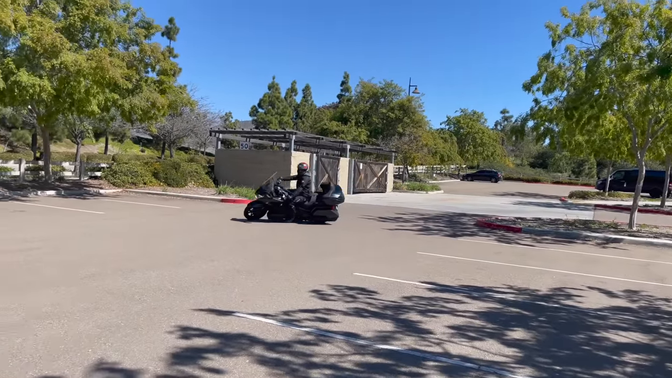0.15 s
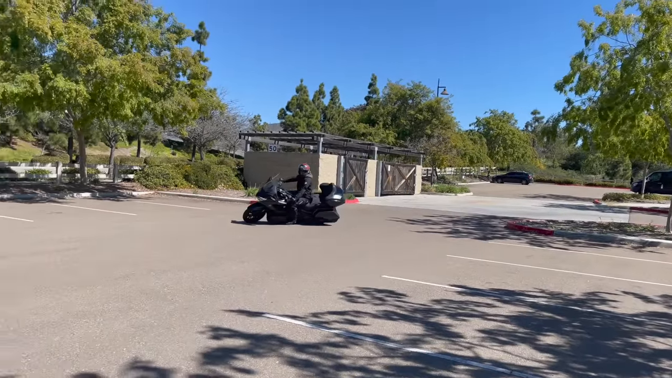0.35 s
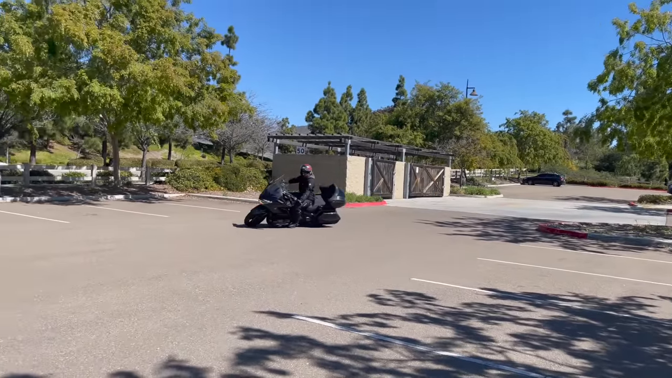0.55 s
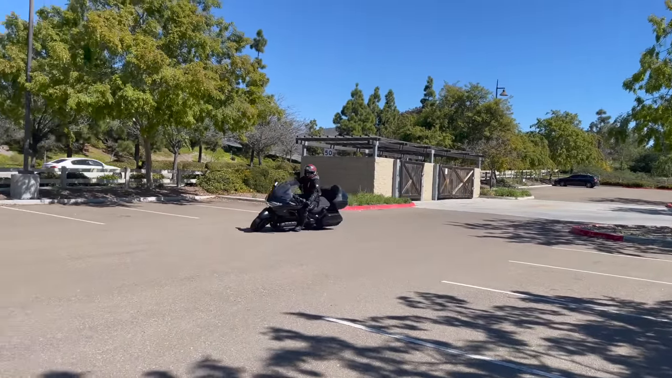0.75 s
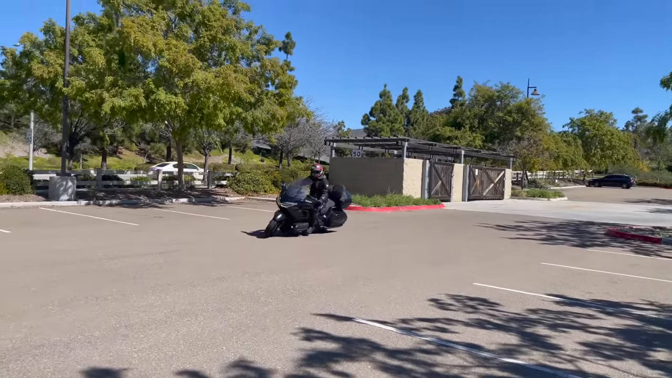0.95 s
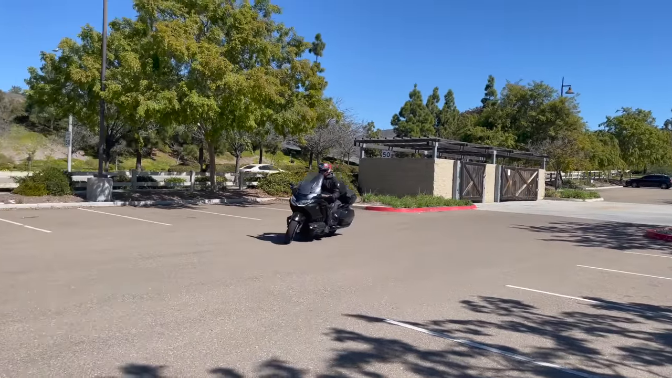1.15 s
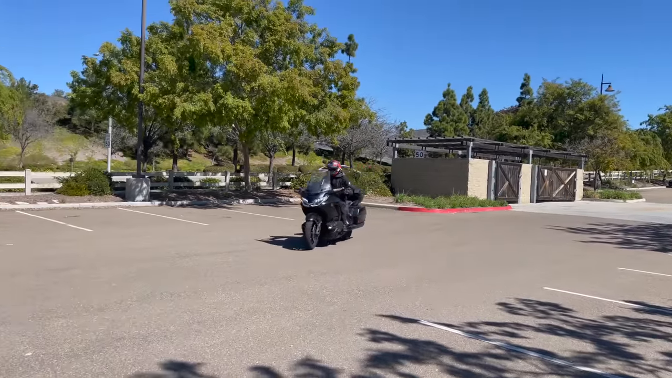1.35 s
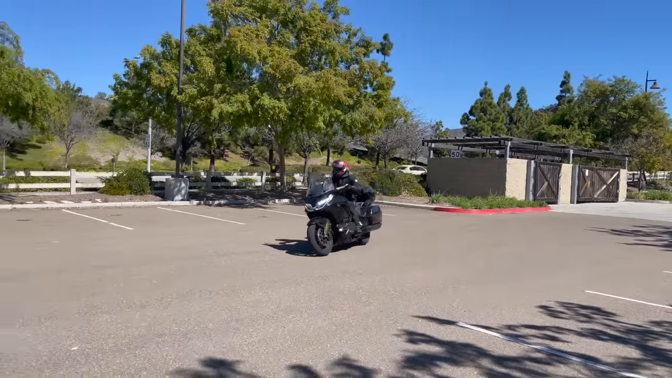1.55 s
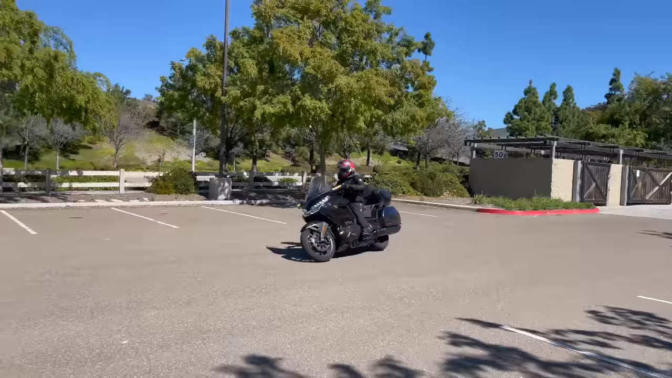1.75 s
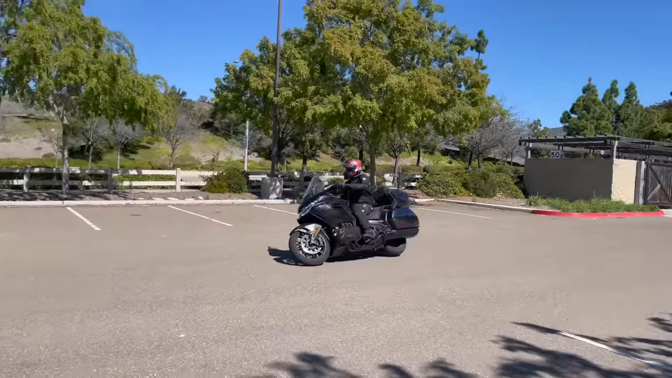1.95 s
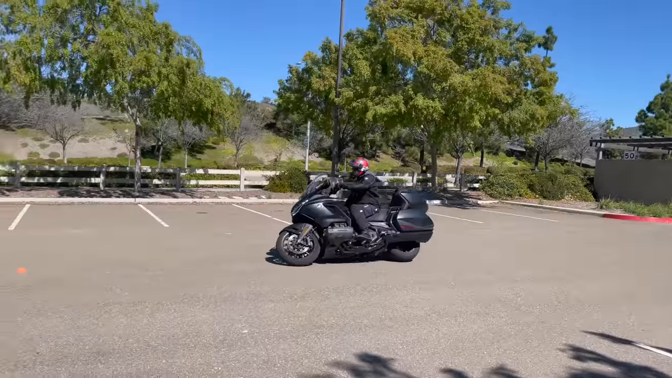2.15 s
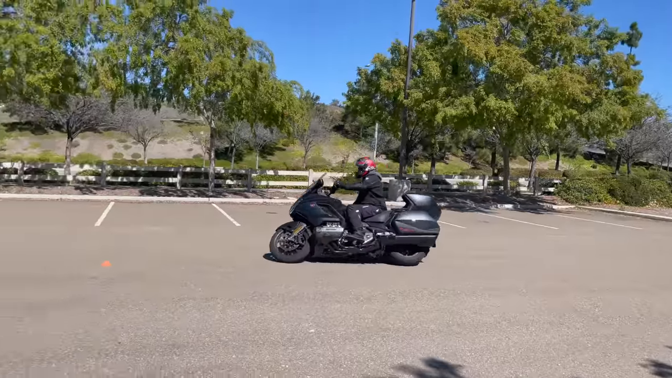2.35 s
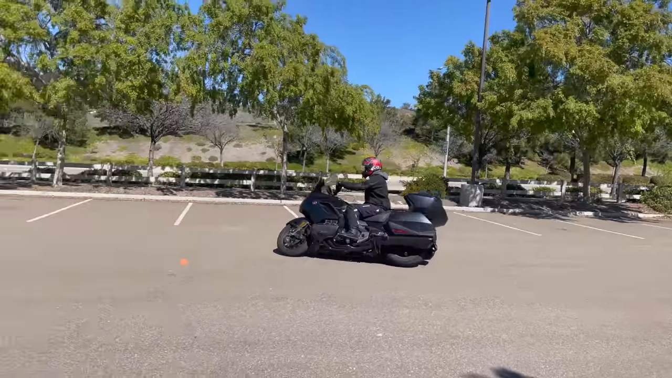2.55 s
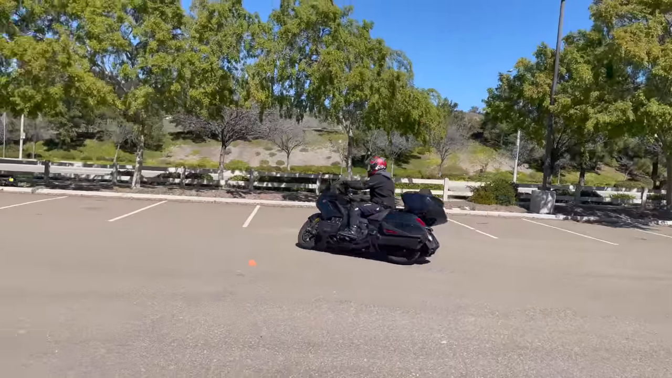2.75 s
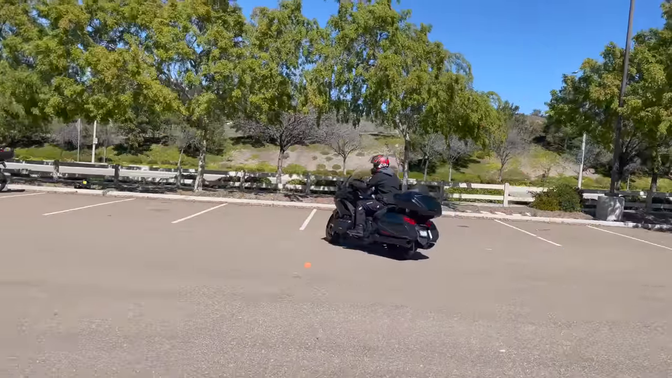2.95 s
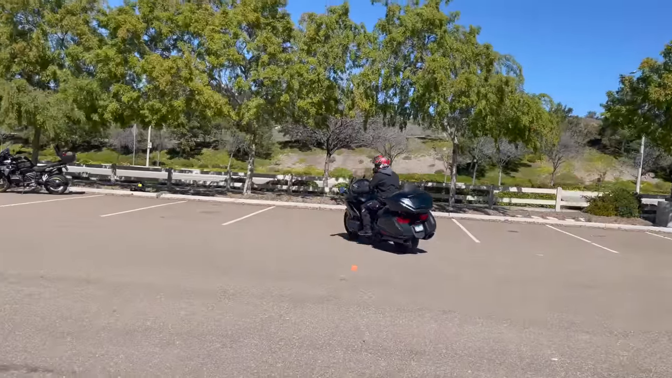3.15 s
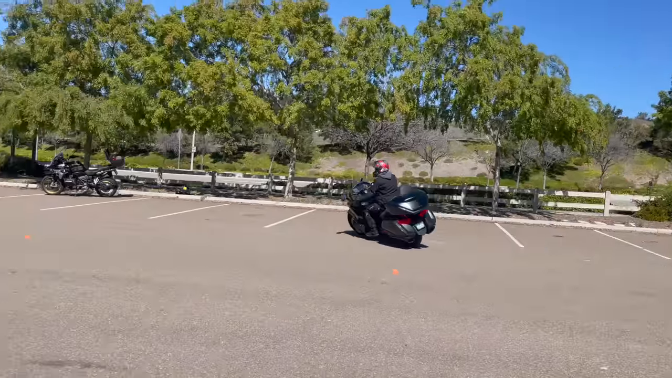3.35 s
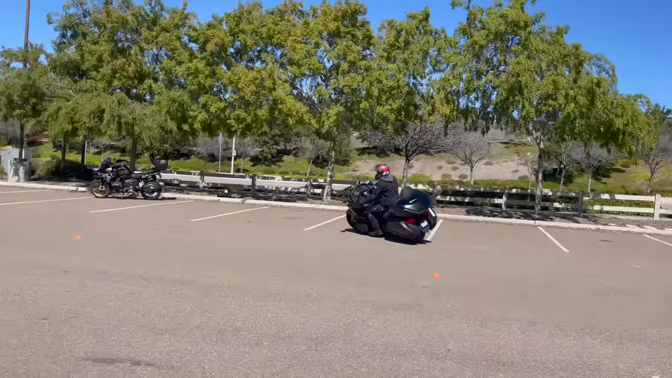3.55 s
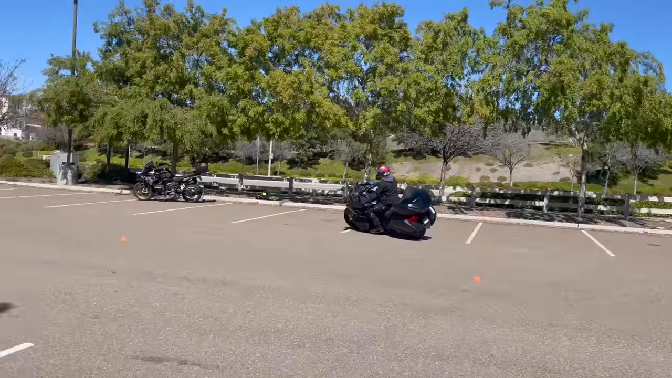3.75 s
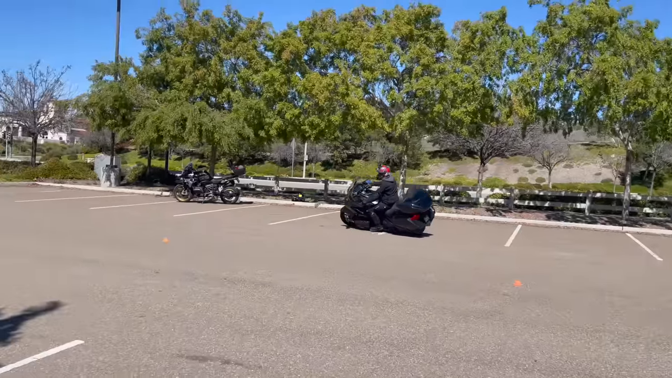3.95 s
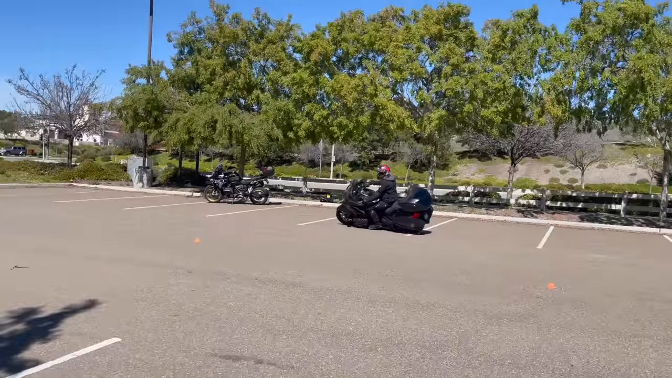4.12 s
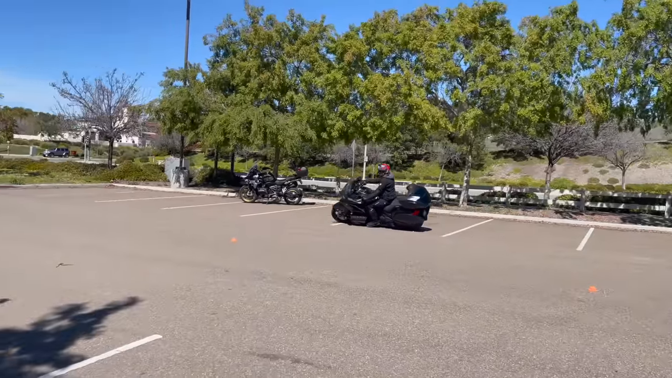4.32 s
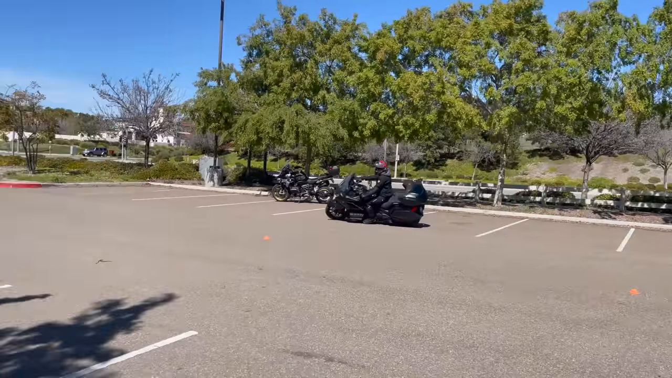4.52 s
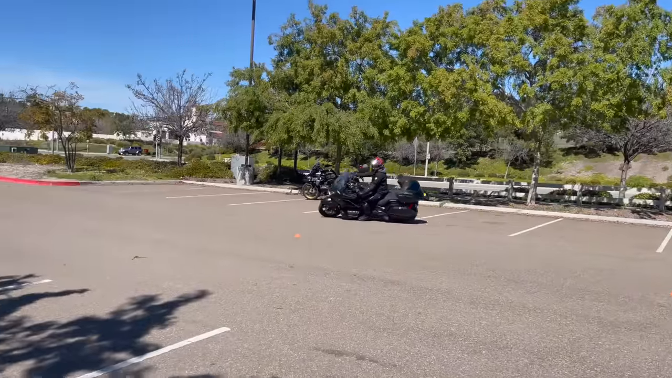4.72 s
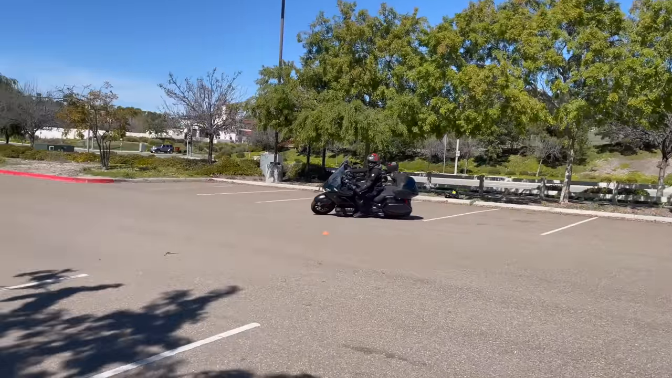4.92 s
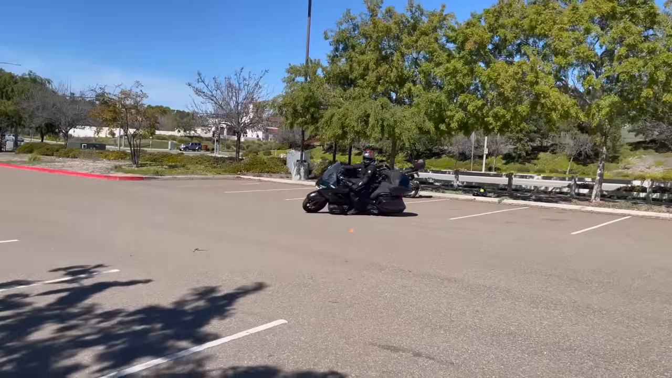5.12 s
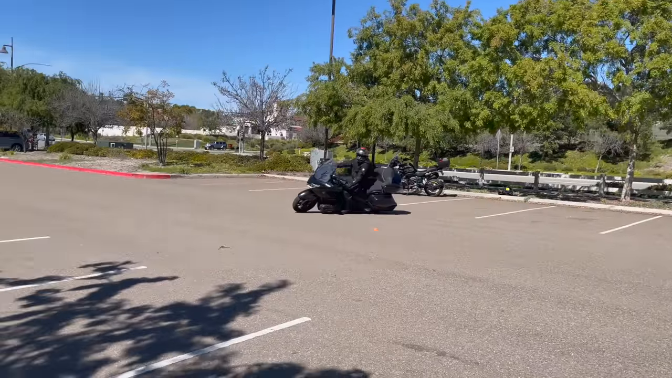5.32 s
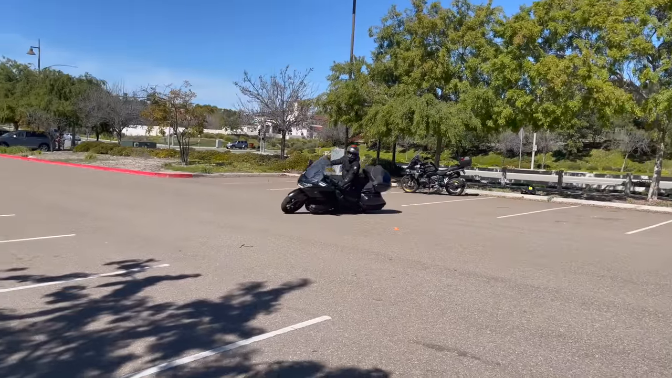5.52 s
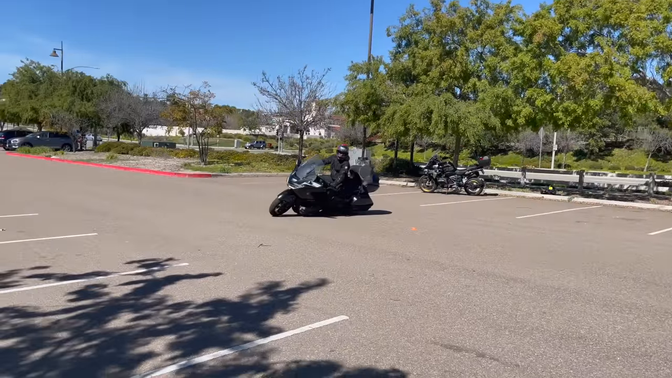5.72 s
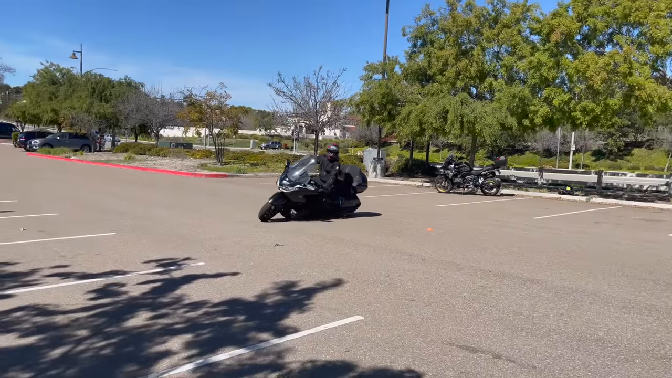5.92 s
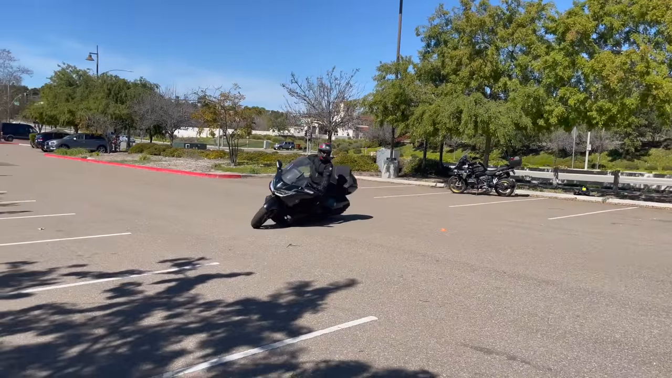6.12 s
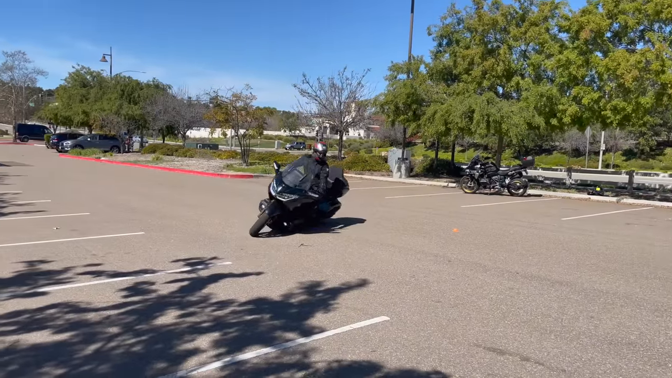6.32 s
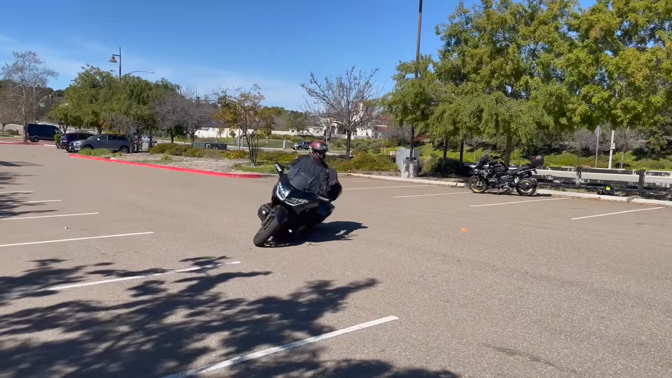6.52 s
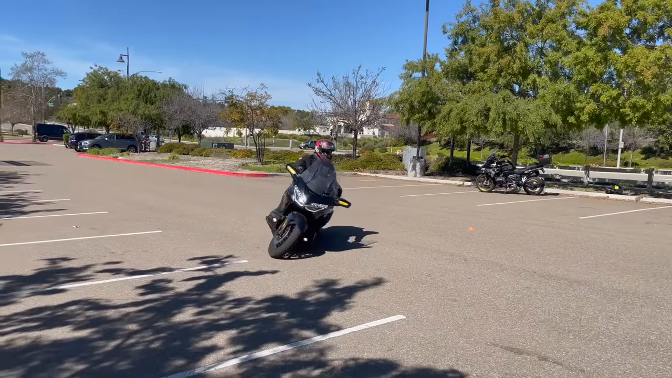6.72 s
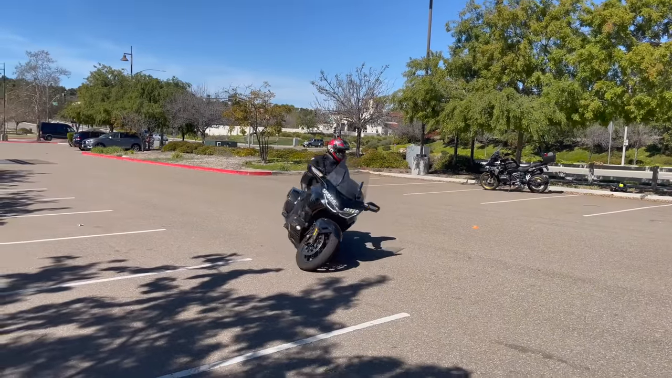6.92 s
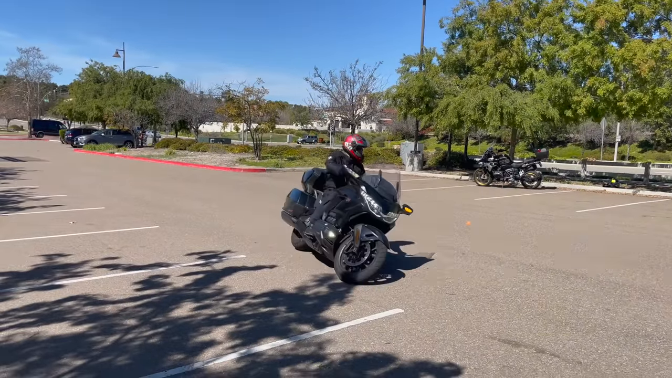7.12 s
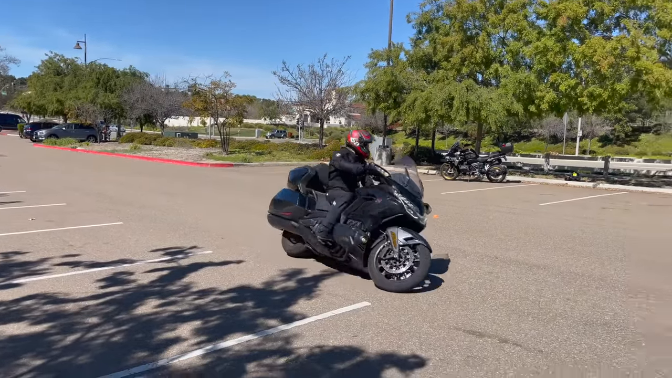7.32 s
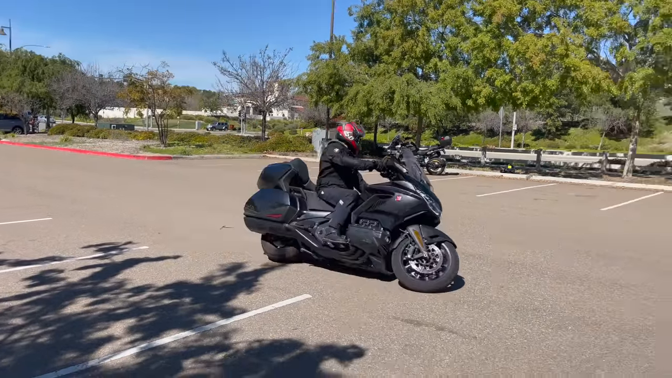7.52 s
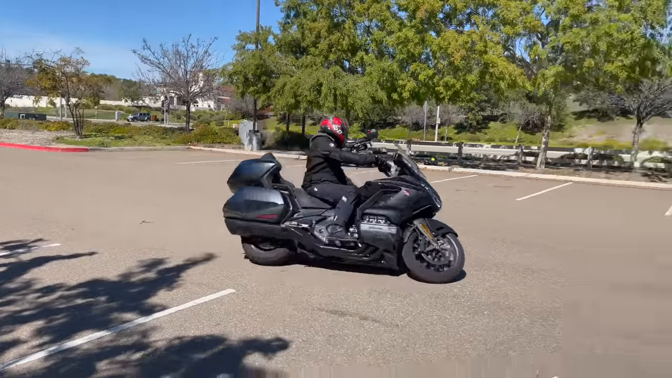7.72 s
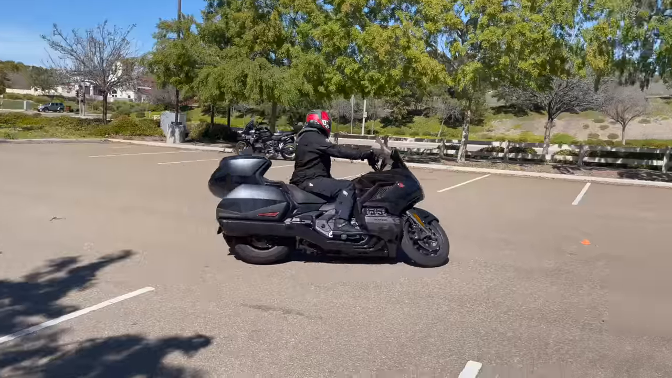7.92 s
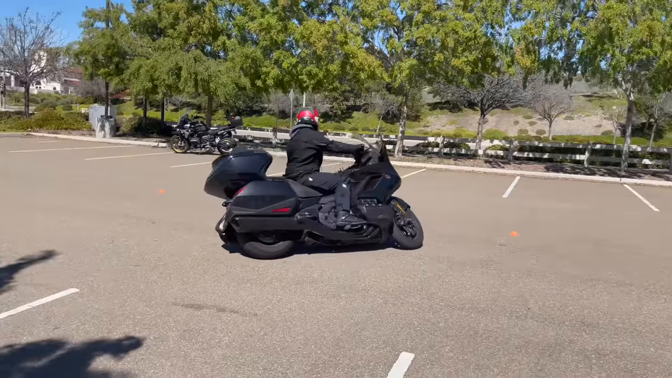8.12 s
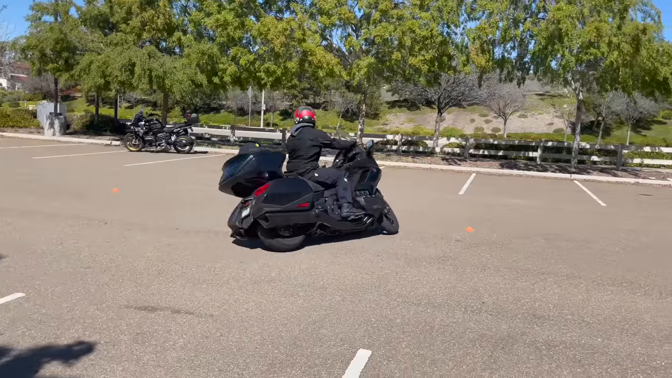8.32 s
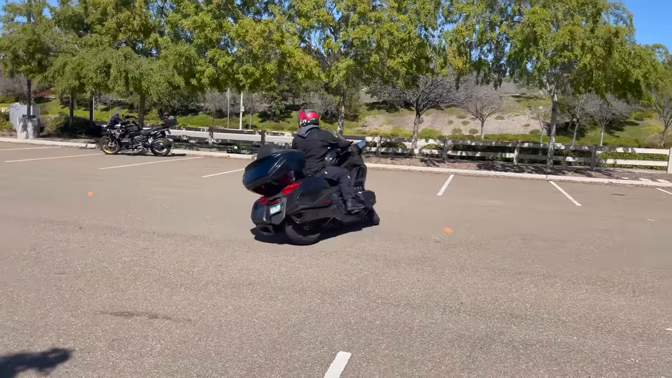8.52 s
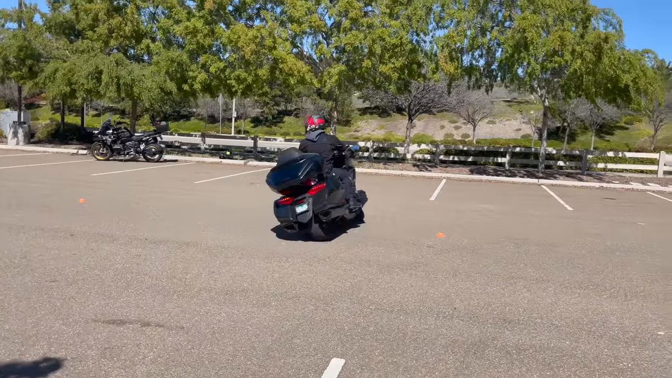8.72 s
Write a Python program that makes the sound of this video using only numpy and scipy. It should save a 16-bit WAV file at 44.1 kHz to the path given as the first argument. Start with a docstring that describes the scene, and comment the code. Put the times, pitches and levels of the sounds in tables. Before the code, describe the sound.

A large six-cylinder motorcycle manoeuvres slowly on an open asphalt lot, heard on a stereo microphone some metres away. It starts with a smooth low hum near 100 Hz, soft gas puffs, fuzzy transmission whine around 1.6 kHz, rustling valves and fine tyre hiss. At 1.15-1.4 s a cluster of dull drive knocks rattles; a low wind gust buffets around 1.6 s, and a dry click lands at 1.7 s. Revs climb by 2-2.6 s as it passes, with rough gear tones and a hollow drone. A knock sounds at 3.2 s; revs rise again briefly, then the throttle closes near 3.9 s and the engine thins, falling in pitch. From 4.4 to 6.4 s it hums steadily farther off, then approaches with grit snapping and a small knock near 6.45 s. At 7.5-8.4 s it passes close, booming deeply with a high gear tone, pitch sinking as it turns away.

```python
"""A six-cylinder touring motorcycle turns slowly on an asphalt lot: crank harmonics boom, noise puffs at each firing.
Near one second the drive knocks (decaying noise bands); then a gust buffets, a click rings (damped modes) and gear
tones swell (rough sines). From the third second the bodywork's drone, a resonant noise band, swells, and grit snaps
in short noise bursts. It passes close near the end with a strong boom and a high gear tone. Throughout, the transmission
whines in fuzzy tones, valves rustle in pulsed noise and tyres hiss in grainy noise; two microphone ports pick it up."""
import sys
import numpy as np
from scipy import signal
from scipy.fft import rfft, irfft
from scipy.io import wavfile

SR = 44100
rng = np.random.default_rng(int(sys.argv[2]) if len(sys.argv) > 2 else 0)


def transcribe(signal):
    """Save signal, clipped to [-1, 1], as a 16-bit WAV file at the path in sys.argv[1]."""
    frames = np.atleast_2d(signal).T
    limited = np.clip(frames, -1, 1)
    pcm = np.round(limited * 32767).astype(np.int16)
    wavfile.write(sys.argv[1], SR, pcm)


N = 386757
T = np.arange(N) / SR  # time [s]
HZ = np.fft.rfftfreq(N, 1 / SR)
FIRINGS = 3  # firings per crank turn; the boom is at twice this order


def gain_of(db):
    """Logarithmic level: decibels to amplitude."""
    return 10 ** (np.asarray(db) / 20)


def evened(x):
    """Normalization of mean power: scales to an rms of 1."""
    return x / np.sqrt(np.mean(x ** 2) + 1e-20)


def curves(rows):
    """Piecewise-linear envelopes: each column of a table joined in time."""
    times, *columns = np.transpose(rows)
    return [np.interp(T, times, column) for column in columns]


def spectra(rows):
    """Frequency responses: each column of a table joined on a log-frequency axis."""
    hz, *columns = np.transpose(rows)
    return [np.interp(np.log(HZ + 1), np.log(hz), column) for column in columns]


def filtered(x, db):
    """Linear filtering: lifts or cuts each frequency by its own number of decibels."""
    return irfft(rfft(x) * gain_of(db), N)


def coloured(x, spectrum):
    """Spectral shaping: filters x by a tabulated spectrum, then sets its rms to 1."""
    return evened(filtered(x, spectra(spectrum)[0]))


def drift(rate_hz):
    """Low-pass random modulation: Gaussian-filtered noise of rms 1, up to about the given rate."""
    step = 64  # samples between slow values
    slow = rng.standard_normal(N // step + 2)
    hz = np.fft.rfftfreq(len(slow), step / SR)
    slow = irfft(rfft(slow) * np.exp(-.5 * (hz / rate_hz) ** 2), len(slow))
    return evened(np.interp(np.arange(N) / step, np.arange(len(slow)), slow))


def tone(turns):
    """Simple harmonic motion: a sine of rms 1 at a random starting phase."""
    return np.sqrt(2) * np.cos(2 * np.pi * (turns + rng.random()))


def fuzzy_tone(turns, width_hz):
    """Quadrature modulation: independent drifts spread a turning phase into a narrow noise band."""
    phase = 2 * np.pi * turns
    return evened(drift(width_hz) * np.cos(phase) + drift(width_hz) * np.sin(phase))


def bursts(turns, depth, decay):
    """Periodic amplitude modulation: noise flares once a turn, in a direct row and a row scattered by the lot."""
    return (1 + depth * np.exp(-(turns % 1) / decay)) * rng.standard_normal((2, N))


def hits(rows):
    """Impact noise: short exponentially dying bursts, each confined to a band round its own pitch."""
    out, t = np.zeros((2, N)), np.arange(4096) / SR
    hz = np.fft.rfftfreq(len(t), 1 / SR) + 1
    lead = 256  # samples of room for the band filter to spread ahead of the onset
    for at_s, db, centre_hz, octaves, t60 in rows:
        band = evened(np.exp(-.5 * (np.log2(hz / centre_hz) / octaves) ** 2))
        burst = rng.standard_normal((2, len(t))) * gain_of(-60 * t / t60)
        burst = irfft(rfft(np.roll(burst, lead, axis=1)) * band)
        start = max(round(at_s * SR) - lead, 0)
        part = out[:, start:start + len(t)]
        part += gain_of(db) * burst[:, :part.shape[1]]
    return out


def exhaust(crank, boom_hz, nearness, heading, throttle):
    """Harmonic radiation: boom and firing note, with crank orders added by uneven cylinders."""
    # the boom at the microphone: (time [s], level [dB])
    boom_levels = [(0, -23.5), (.2, -21), (.75, -24.5), (1.15, -27.5), (1.4, -24), (2.5, -26.5),
                   (3.3, -28.5), (3.78, -35.5), (4.15, -30), (4.4, -27.5), (5.2, -22.5), (5.8, -29),
                   (6.4, -26), (6.6, -30), (6.8, -23), (7.17, -24), (7.55, -15), (7.95, -12.5),
                   (8.4, -14.5), (8.77, -17.5)]
    # other crank orders: (crank order, level re boom when lugging [dB], the same when pulling [dB])
    # before the pipe's resonance and a 0.5 dB cut
    pipe_orders = [(2.5, -40, -27), (3.5, -35, -21), (4, -31, -9), (4.5, -12, -16), (5, -30, -10),
                   (5.5, -26, -14), (6.5, -20, -27), (7, -17.5, -15), (7.5, -14.5, -14), (8, -23, -12.5),
                   (8.5, -28, -17), (9, -12.5, -13), (9.5, -26, -22), (10, -22, -15), (10.5, -22, -27),
                   (11, -30, -24), (11.5, -31, -22), (12, -19, -22), (13, -26, -27), (14, -29, -27),
                   (17.4, -33, -21), (18, -36, -23)]
    lugging_hz, pulling_hz = 101.4, 123  # boom pitches at which those levels hold
    boom_db = curves(boom_levels)[0] + 0.58 * drift(10.0)
    out = gain_of(boom_db) * tone(2 * FIRINGS * crank) * (1 + .05 * drift(8.3))

    # the firing note, an octave below the boom, collapses when the throttle nearly shuts
    overrun_below, overrun_db = 0.15, -24  # throttle opening 0-1, dB when fully shut
    overrun = np.clip(1 - throttle / overrun_below, 0, 1)
    firing_db = -32 + 4 * nearness + 9 * (throttle - .5) + overrun_db * overrun
    firing_db += -1.5 * np.cos(np.radians(heading))  # weaker nose on, stronger from behind
    out += gain_of(firing_db + 2.0 * drift(2.4)) * tone(FIRINGS * crank)

    # the pipe's resonance comes out under throttle and from behind
    pipe_ring_hz, pipe_ring_width_hz = 183, 26
    ring_db = 9 * (throttle - .4) - 2.5 * np.cos(np.radians(heading))
    pull = np.clip((boom_hz - lugging_hz) / (pulling_hz - lugging_hz), 0, 1)
    for order, lugging_db, pulling_db in pipe_orders:
        order_hz = order * boom_hz / (2 * FIRINGS)
        ring = 1 / (1 + ((order_hz - pipe_ring_hz) / pipe_ring_width_hz) ** 2)
        level_db = boom_db + lugging_db + pull * (pulling_db - lugging_db) + ring * ring_db - 0.5
        out += gain_of(level_db) * (tone(crank * order) + .14 * fuzzy_tone(crank * order, width_hz=0.76))
    return out


def machinery(crank, puff_db, casing_db):
    """Pulsed broadband excitation: gas puffs and casing clatter at each firing."""
    # both spectra: (frequency [Hz], relative level [dB])
    puff_spectrum = [(30, -28), (60, -4.5), (130, -4.5), (190, -5), (260, -5), (320, -8), (380, -14),
                     (480, -17), (800, -30.5), (2000, -84)]
    casing_spectrum = [(200, -27), (420, -8), (560, -1), (700, 1.5), (820, 2.5), (950, -4), (1200, -5),
                       (1500, -4.5), (1800, -8), (2000, -16.5), (2250, -11), (2650, -33), (3200, -19.5),
                       (5000, -55)]
    puffs = coloured(bursts(FIRINGS * crank, depth=1.27, decay=0.35), puff_spectrum)
    clatter = bursts(FIRINGS * crank, depth=0.28, decay=0.12) * gain_of(1.26 * drift(13.0))
    return puffs * gain_of(puff_db) + coloured(clatter, casing_spectrum) * gain_of(casing_db)


def gears(crank):
    """Tooth-mesh tones filtered by resonance: each swells while its gear is loaded, loudest where the gearbox rings."""
    # four tooth tones: (crank order, roughness [0-1], width [Hz])
    gear_tones = [(35.5, .45, 13), (38.2, .33, 11), (51, .55, 20), (57, .85, 55)]
    # the gearbox's resonances: (frequency [Hz], gain [dB])
    gearbox = [(700, 0), (740, -1), (765, 2), (800, -2), (838, 3), (870, -2), (920, 0)]
    # each tone before the gearbox: (time [s], level [dB])
    low_levels = [(1.3, -56), (1.7, -47), (2.1, -45), (2.35, -47), (2.8, -45), (3.3, -52), (3.9, -58),
                  (4.4, -48), (5.1, -58)]
    middle_levels = [(1.2, -58), (1.6, -44), (1.85, -42), (2.05, -36.5), (2.3, -47), (2.6, -45), (3.2, -54),
                     (3.9, -58), (4.3, -48.5), (4.9, -54), (7, -60)]
    high_levels = [(0, -46), (.3, -43), (.7, -60), (7, -60), (7.3, -37.5), (7.5, -41), (7.66, -34),
                   (7.85, -42), (8.1, -38), (8.4, -39), (8.77, -48)]
    top_levels = [(0, -45), (.3, -44), (.7, -52), (1.2, -42), (1.8, -71), (7.6, -69), (8.2, -44),
                  (8.77, -44)]
    out = np.zeros(N)
    all_levels = (low_levels, middle_levels, high_levels, top_levels)
    for (order, rough, width_hz), levels in zip(gear_tones, all_levels):
        level_db = curves(levels)[0] + 2.1 * drift(3.5)  # random flicker
        mesh = (1 - rough) * tone(order * crank) + rough * fuzzy_tone(order * crank, width_hz)
        out += gain_of(level_db) * evened(mesh)
    return filtered(out, spectra(gearbox)[0])


def whine(crank, crank_hz, nearness):
    """Tone in narrow-band noise: the transmission whines, a fluttering line and fuzzy whir, with faint overtones."""
    # the whine wanders a little against the crank: (time [s], crank order)
    whine_orders = [(.6, 88.6), (1.1, 90.3), (1.35, 90.3), (1.6, 88), (2.3, 87.5), (2.7, 90), (4.4, 89.2),
                    (5.6, 87.6), (5.9, 89), (6.9, 87.5), (7.55, 89), (8.05, 87.5), (8.5, 88.8)]
    # line and whir: (time [s], level setting [dB])
    whir_levels = [(0, -48), (.5, -44), (1.05, -43.5), (1.25, -46), (1.45, -40), (1.9, -53), (2.15, -48),
                   (2.6, -48), (3, -61), (3.6, -58), (4.2, -48), (5.5, -44), (5.9, -41.5), (6.15, -45),
                   (7.05, -45), (7.5, -38), (7.75, -40.5), (8.05, -37.5), (8.25, -44), (8.5, -42),
                   (8.77, -48)]
    turns = np.cumsum(curves(whine_orders)[0] * crank_hz) / SR
    line = tone(turns + .17 * drift(38)) + .25 * fuzzy_tone(turns, width_hz=20)
    direct = line + .7 * fuzzy_tone(turns, width_hz=65)
    scattered = .6 * fuzzy_tone(turns, width_hz=65)
    # it throbs once a crank turn and flutters at random
    throb = 1 + .35 * np.cos(2 * np.pi * crank)
    whir = np.array([direct, scattered]) * evened(throb * gain_of(.6 * drift(18)))

    # the overtones, near an octave and at a fifth above the line, grow with nearness and revs
    octave = np.array([fuzzy_tone(175.5 * crank, width_hz=105) for _ in range(2)])
    fifth = np.array([fuzzy_tone(1.5 * turns, width_hz=110) for _ in range(2)])
    cruise_hz = 110  # the boom's pitch at an easy cruise
    revs = np.log2(2 * FIRINGS * crank_hz / cruise_hz)  # octaves above cruising speed
    overtone_db = -57 + 2.5 * nearness + 8 * revs + 2.6 * drift(7)
    return gain_of(curves(whir_levels)[0]) * whir + (octave + gain_of(-8.5) * fifth) * gain_of(overtone_db)


def valves(crank, rustle_db):
    """Periodic impact noise: the valve gear rustles twice for each firing."""
    # (frequency [Hz], relative level [dB])
    rustle_spectrum = [(500, -38), (1500, 7.5), (2300, 4), (2650, 4), (3100, 6.5), (4000, 3.5), (4700, 3),
                       (5800, 0.5), (7300, -3.5), (9000, -2), (12000, -16)]
    taps = bursts(2 * FIRINGS * crank, depth=0.84, decay=0.11) * gain_of(2.12 * drift(18.5))
    return coloured(taps, rustle_spectrum) * gain_of(rustle_db)


def drone(crank):
    """Forced resonance: a hollow mode of the bodywork, shaken at each firing."""
    # (time [s], level [dB])
    drone_levels = [(0, -44), (.7, -60), (1.3, -61), (1.7, -47), (2.3, -38.5), (3, -46), (4, -52),
                    (5.3, -51), (6.5, -47), (7.5, -41.5), (8.1, -40), (8.77, -53)]
    centre_hz, width_hz = 383, 37
    band = np.exp(-.5 * ((HZ - centre_hz) / width_hz) ** 2)
    shaking = bursts(FIRINGS * crank, depth=1.5, decay=0.49)
    return evened(irfft(rfft(shaking) * band, N)) * gain_of(curves(drone_levels)[0])


def radiated(heading, nearness, throttle):
    """Directivity and distance: level in dB of each part, from the side it shows, its nearness and the throttle."""
    # at 10 m and half throttle: (heading [degrees], gas puffs [dB], casing [dB], valves [dB],
    # tread [dB], narrow hiss [dB])
    directivity = [(0, -28.5, -37, -47, -44.5, -40.5), (30, -30.5, -36.5, -46.5, -44, -49),
                   (61.4, -31.5, -35, -44, -43.5, -56.5), (87, -32.5, -35.5, -44, -44.5, -55),
                   (116, -32, -36.5, -46.5, -46.5, -53), (154.05, -32, -38.5, -44, -51, -74)]
    # the same five parts: (gain as the distance halves [dB], gain from shut to full throttle [dB])
    response = [(3, 10.5), (4, 8), (10.5, -4), (9, -7.5), (1, 17)]
    degrees, *parts = np.transpose(directivity)
    return [np.interp(heading, degrees, db) + near_db * nearness + throttle_db * (throttle - .5)
            for db, (near_db, throttle_db) in zip(parts, response)]


def shaded(sound, heading):
    """Directional filtering: the bodywork ripples the spectrum, one way from behind and another from ahead."""
    # (frequency [Hz], gain from behind [dB], gain from ahead [dB])
    shade = [(2200, 1.5, 1.5), (2580, -3, 1.5), (2900, 4.5, 2), (3220, -2.5, -4), (3730, 1.5, 1.5),
             (4300, -2.5, -1), (4600, -1.5, -1), (4850, -2, 1), (5400, -4.5, 0), (5850, 0.5, 2),
             (6150, -4.5, -5), (6500, 4, 1.5), (7250, -3, -3.5), (7700, -0.5, -3), (8140, 4, 2),
             (8800, -4, -6.5), (9400, 2, 1), (10500, 0.5, 0.5)]
    ahead_until_deg, behind_from_deg, turn_deg = 30, 59, 60
    behind_db, ahead_db = spectra(shade)
    behind = np.clip((heading - behind_from_deg) / turn_deg, 0, 1)
    ahead = np.clip((ahead_until_deg - heading) / turn_deg, 0, 1)
    plain = (1 - behind - ahead) * sound
    return plain + behind * filtered(sound, behind_db) + ahead * filtered(sound, ahead_db)


def hiss(tread_db, nose_db, grains_per_s=160, grain_size=8):
    """Granular noise: tread crushes fine grains; a narrow hiss is strongest with the nose to the microphone."""
    # both spectra: (frequency [Hz], relative level [dB])
    tread_spectrum = [(3000, -26), (5000, -8.5), (7300, -8), (8800, -5.5), (10000, -3.5), (11100, 3.5),
                      (12000, -5.5), (13000, -34)]
    nose_spectrum = [(2500, -8), (4500, -2.5), (5300, 1), (5800, 3.5), (6400, -1), (7300, -44),
                     (10000, -37)]
    grains = rng.random(N) < grains_per_s / SR
    crunch = (1 + grain_size * grains) * rng.standard_normal((2, N))
    tread = coloured(crunch * gain_of(1.55 * drift(10.0)), tread_spectrum) * gain_of(tread_db)
    return tread + coloured(rng.standard_normal((2, N)), nose_spectrum) * gain_of(nose_db)


def grit():
    """Transient fracture noise: the loudest snaps of grit under the tyres."""
    # (time [s], level [dB], centre [Hz], bandwidth [octaves], 60 dB decay [s])
    snaps = [(0.766, -34, 5150, 0.68, 0.068), (2.472, -25, 3250, 0.99, 0.015),
             (2.617, -25, 2399, 0.27, 0.02), (3.576, -34, 5175, 0.93, 0.031),
             (3.764, -32, 9760, 0.47, 0.02), (4.028, -32, 4510, 1.0, 0.013),
             (4.617, -30.5, 6700, 0.83, 0.015), (4.721, -30.5, 7740, 0.4, 0.019),
             (5.51, -38, 4800, .7, .07), (6.201, -29.5, 6403, 0.78, 0.014),
             (6.253, -29.5, 3235, 1.0, 0.022), (6.431, -27.5, 4800, 1.0, 0.043),
             (6.483, -28, 5030, 0.53, 0.024), (6.749, -26.5, 7760, 0.68, 0.016),
             (6.98, -24.5, 6606, 0.79, 0.02), (7.682, -22, 5460, 1.0, 0.027),
             (7.762, -21.5, 3130, 0.9, 0.016), (7.888, -23, 2660, 0.95, 0.021),
             (8.458, -26, 3506, 1.0, 0.025), (8.552, -24, 3030, 0.75, 0.02)]
    return hits(snaps)


def small_grit(tread_db):
    """Random impacts at a fixed mean rate: small stones snap, louder when the tread is."""
    per_s, above_tread_db, spread_db = 4.4, 5, 9.5  # spread either way
    centre_hz, octaves, t60 = 5500, 1.0, 0.023  # the pitch varies half an octave either way
    snaps = []
    for when, size, pitch in rng.random((round(per_s * N / SR), 3)):
        level_db = tread_db[int(when * N)] + above_tread_db + spread_db * (1 - 2 * size)
        snaps.append((when * N / SR, level_db, centre_hz * 2 ** (pitch - .5), octaves, t60))
    return hits(snaps)


def knocks(thud_hz=200, thud_db=-4, thud_s=0.1):
    """Impact excitation: each knock in the drive also sets the bodywork thudding."""
    # (time [s], level [dB], centre [Hz], bandwidth [octaves], 60 dB decay [s])
    drive_knocks = [(1.157, -20, 950, .6, .05), (1.194, -26, 950, .6, .045), (1.229, -29, 950, .6, .045),
                    (1.282, -29.5, 850, .6, .06), (1.311, -26, 1120, .6, .06), (1.343, -30, 950, .45, .04),
                    (1.398, -30, 1050, .4, .035), (3.188, -24.5, 1050, .75, .049),
                    (6.434, -30.5, 1569, .3, .06), (6.46, -24.5, 1680, .17, .035)]
    thuds = [(at_s, db + thud_db, thud_hz, .5, thud_s) for at_s, db, *_ in drive_knocks]
    return hits(drive_knocks) + hits(thuds)


def click():
    """Damped modal ringing: one hard, dry click."""
    # (frequency [Hz], level [dB], 60 dB decay [s])
    click_modes = [(1750, -13.5, 0.013), (2520, -16, 0.0083), (2780, -17, 0.0086), (4500, -18, 0.0049)]
    t = np.maximum(T - 1.7087, 0)  # seconds since the click
    rise = np.minimum(t / .0007, 1)
    ringing = np.zeros(N)
    for hz, db, t60 in click_modes:
        ringing += gain_of(db - 60 * np.minimum(t / t60, 4)) * np.sin(2 * np.pi * hz * t)
    return rise * ringing


def wind():
    """Turbulent pressure noise: lumpy low buffeting at the microphone, swelling once in a gust."""
    # (frequency [Hz], relative level [dB])
    wind_spectrum = [(15, -35), (32, 8), (48, 11), (70, 16), (120, 10), (250, -17), (700, -58)]
    breeze_db, gust_db, gust_at_s, gust_width_s = -45, 17.5, 1.6, .58
    level_db = breeze_db + gust_db / (1 + ((T - gust_at_s) / gust_width_s) ** 2)
    return coloured(rng.standard_normal((2, N)), wind_spectrum) * gain_of(level_db + 3.5 * drift(7.9))


def ports(sound):
    """Interchannel coherence: likeness, phase lead and balance of the two ports at each frequency."""
    # both tables: (frequency [Hz], likeness [0-1], left lead [radians], left minus right [dB])
    port_rows = [(30, 0.25, 1.6, -4), (80, 0.81, 0, 0.4), (312, 1, 0.5, -1), (437, 1, 0.6, 0.5),
                 (525, 0.53, 1, 3.5), (730, 0.78, -0.44, 1), (860, 0.12, 0.77, 2), (1030, 0, .5, 4.5),
                 (1320, 0.05, 0, 2.5), (1590, 0.69, -1.05, 0.5), (1950, 0.53, 1, -2.5),
                 (2470, 0.98, 0.5, -6), (2540, 0.6, 1.5, -4), (2760, 0.5, 2, -2), (3120, 0.86, 2.5, 1.5),
                 (3560, 0.6, 2, 8.5), (4100, 0.4, 1.3, 4), (4480, .67, 0.5, 13), (4630, .45, 2.5, -3),
                 (4840, 0, 1.5, -1), (5100, 0.1, -3, 6), (5530, 0.2, -1, 4), (5860, 0.63, 0, -4),
                 (6560, 0.76, -1.5, 3), (7300, 0, 0, -4.5), (8100, 0, 2.5, 1.5)]
    top_rows = [(8800, .8, 0, 1), (9400, .8, -1.5, 0), (9780, .99, -2.95, 0), (10350, .99, -3.3, 0),
                (11000, .9, -4.5, 0), (11800, .92, -5.9, 0)]  # the top octave
    likeness, lead, balance_db = spectra(port_rows + top_rows)
    likeness = np.clip(likeness, 0, 1)
    # direct sound is common to both ports, scattered sound opposed
    direct, scattered = rfft(sound) * np.sqrt([(1 + likeness) / 2, (1 - likeness) / 2])
    skew = gain_of(balance_db / 2) * np.exp(.5j * lead)
    return irfft(np.array([(direct + scattered) * skew, (direct - scattered) / skew]), N)


def scene():
    """Common excitation: one crank speed sets the engine's pitches; path and throttle shape the levels."""
    # engine speed: (time [s], boom frequency, six times the crank's [Hz])
    speed = [(0.0, 98.2), (.35, 101.6), (.62, 106.5), (.95, 110.8), (1.3, 109.3), (1.5, 112), (2.0, 127.9),
             (2.28, 132.1), (2.59, 133.3), (2.9, 127.8), (3.17, 121.6), (3.6, 132.5), (3.75, 130.5),
             (3.96, 123.3), (4.3, 116.6), (5.0, 109.3), (5.45, 110.1), (5.65, 112.3), (6.0, 109.1),
             (6.17, 106.5), (6.4, 108.4), (7.2, 101.1), (7.65, 97.3), (8.4, 87.82), (8.77, 81.7)]
    # (time [s], throttle opening [0-1])
    throttle_rows = [(0, 0.81), (1.2, 0.78), (2.1, 0.62), (3.45, 0.48), (3.95, 0.07), (4.4, 0.14),
                     (5.6, 0.38), (7.2, 0.25), (8.77, 0.77)]
    # a figure of eight: (time [s], distance [m], heading [degrees]: 0 nose to the microphone, 180 tail)
    path = [(0, 16.6, 74), (.8, 13.4, 50), (1.4, 14.1, 62), (2, 7.5, 41), (2.65, 5.93, 133),
            (3.2, 11.2, 177), (3.7, 10, 126), (4.3, 10.2, 100), (5.2, 14.45, 74), (6.2, 11.05, 11.86),
            (6.9, 7.9, 3.9), (7.32, 4.62, 40.4), (7.9, 5.25, 66.7), (8.77, 8.6, 123)]
    boom_hz, = curves(speed)
    throttle, = curves(throttle_rows)
    distance_m, heading = curves(path)
    nearness = np.log2(10 / distance_m)  # halvings of the distance from 10 m
    puff_db, casing_db, rustle_db, tread_db, nose_db = radiated(heading, nearness, throttle)
    crank_hz = boom_hz / (2 * FIRINGS)
    crank = np.cumsum(crank_hz) / SR  # turns

    # row 0 is direct sound, row 1 scattered
    sound = machinery(crank, puff_db, casing_db)
    sound += shaded(valves(crank, rustle_db) + hiss(tread_db, nose_db), heading)
    sound += whine(crank, crank_hz, nearness) + drone(crank) + wind()
    sound[0] += exhaust(crank, boom_hz, nearness, heading, throttle) + gears(crank)
    sound += knocks() + grit() + small_grit(tread_db)
    return ports(sound) + click()  # the click reaches both ports together


def record(dry):
    """Band limitation: a linear-phase low-pass filter removes the highest treble."""
    edge_hz = 13100
    low_pass = signal.firwin(511, edge_hz, window=("kaiser", 9), fs=SR)
    return signal.oaconvolve(dry, low_pass[None], "same")


dry = scene()
out = record(dry)
transcribe(out)
```